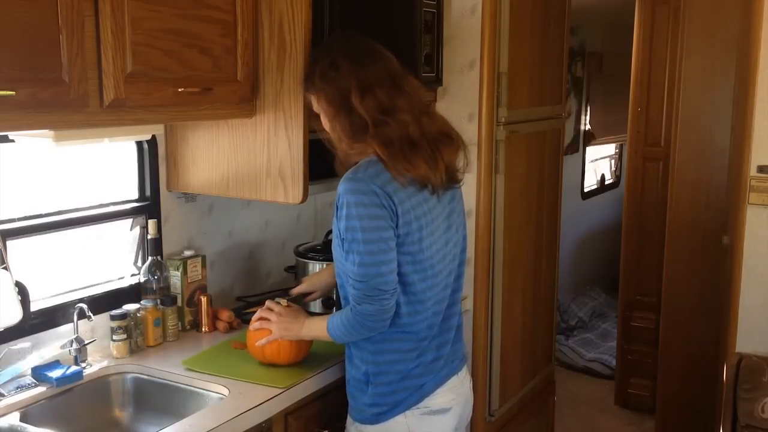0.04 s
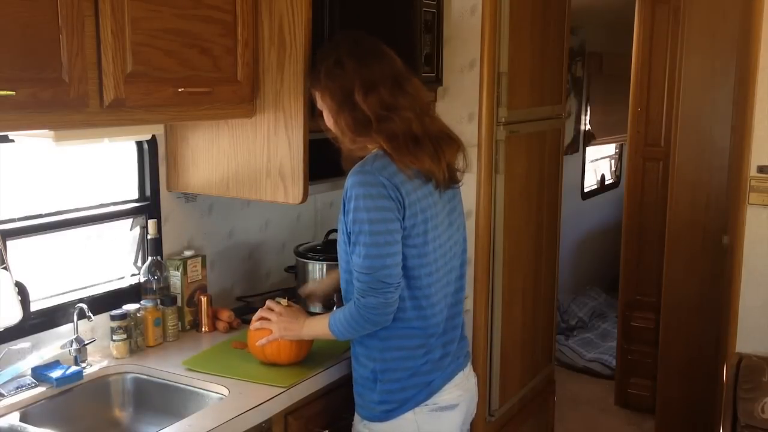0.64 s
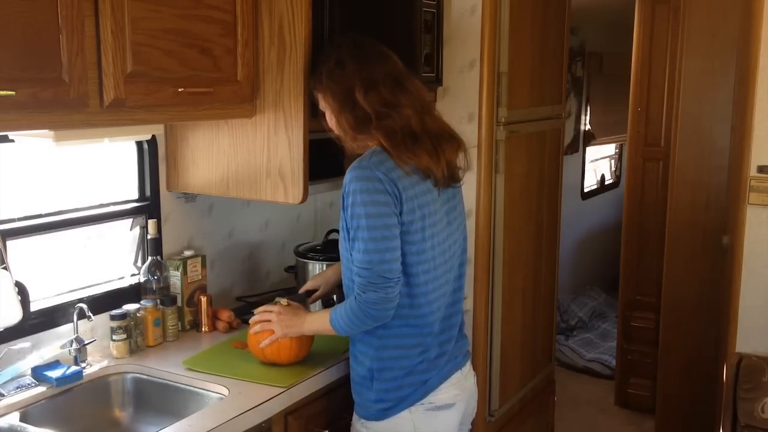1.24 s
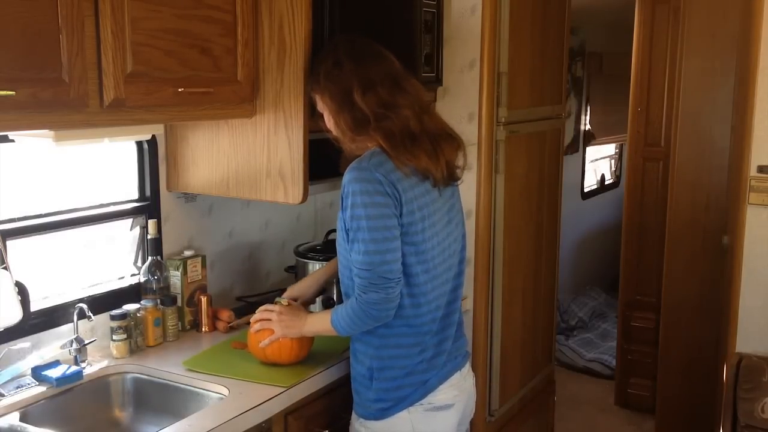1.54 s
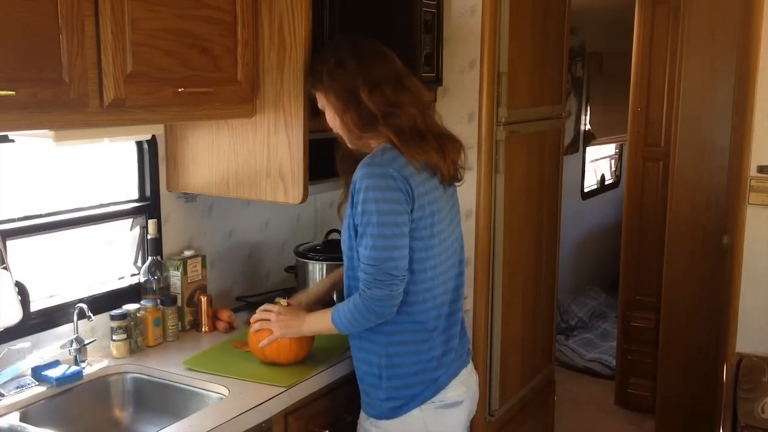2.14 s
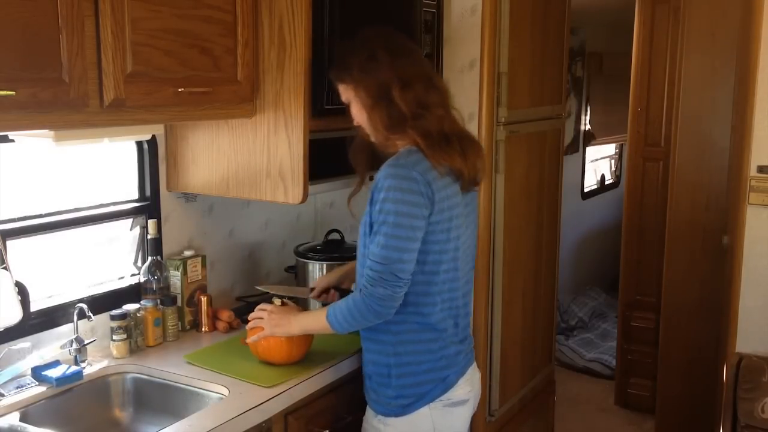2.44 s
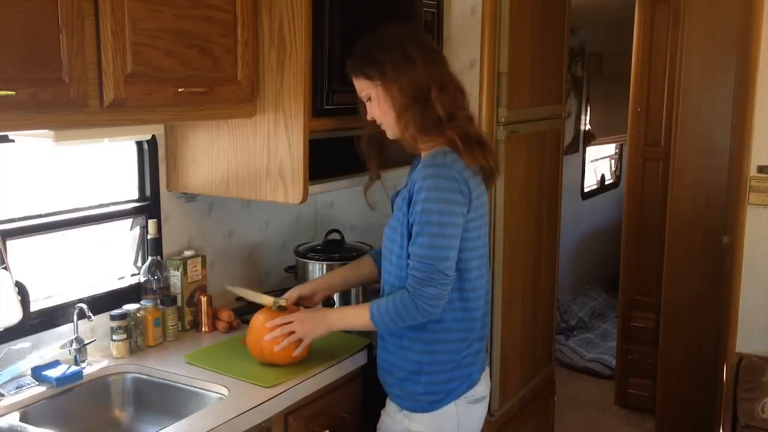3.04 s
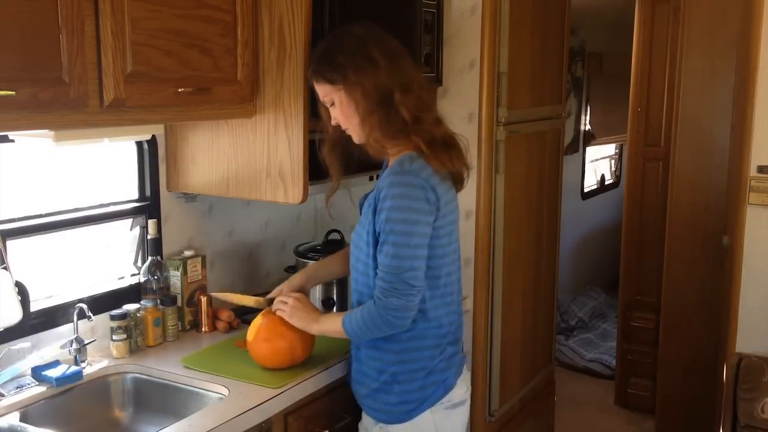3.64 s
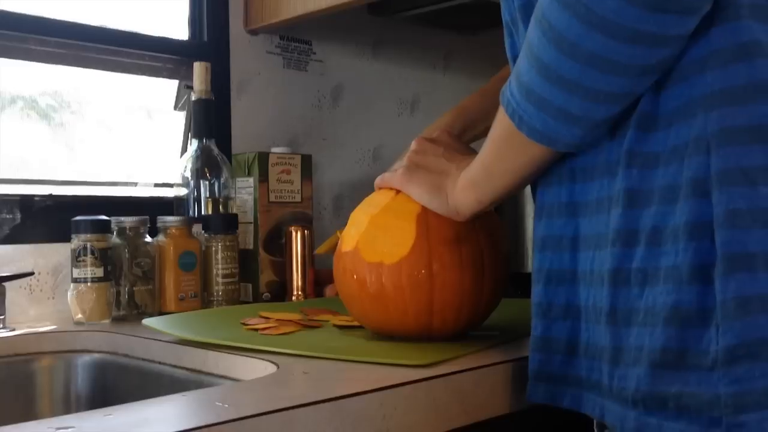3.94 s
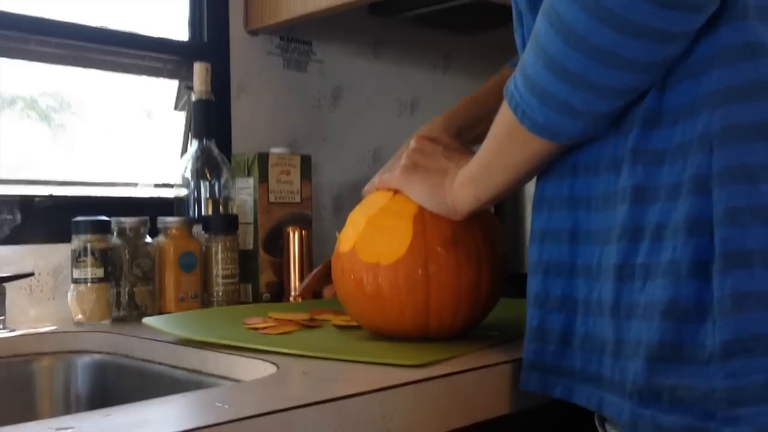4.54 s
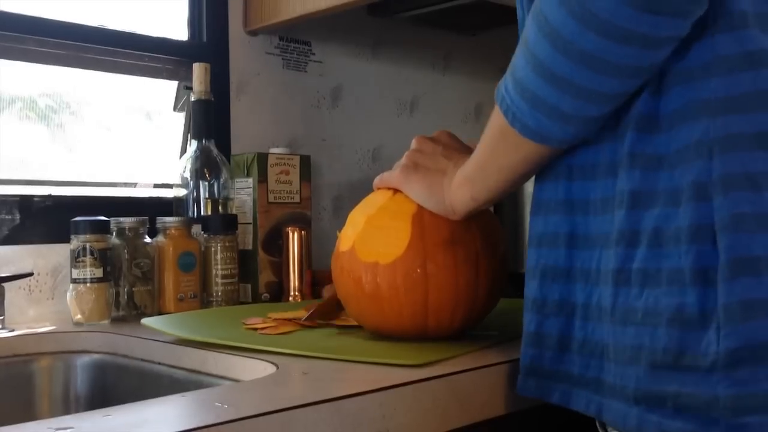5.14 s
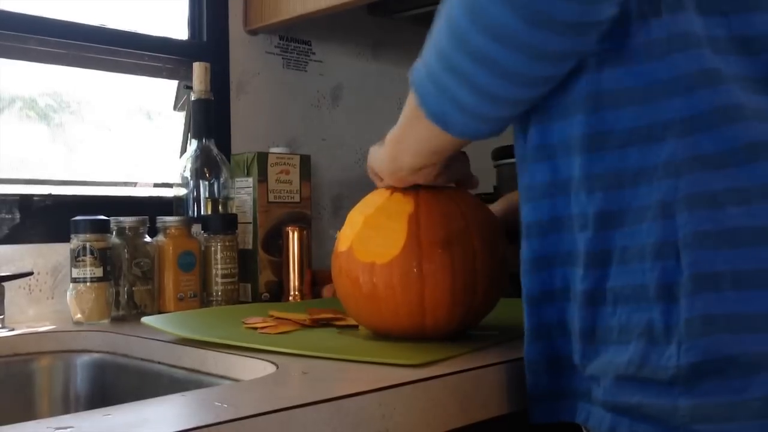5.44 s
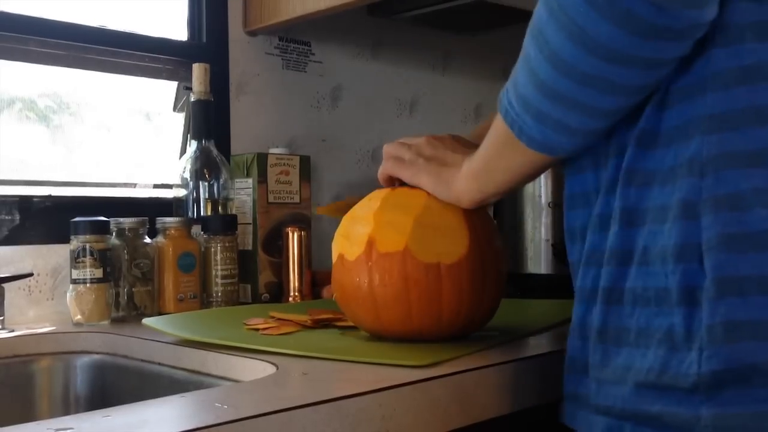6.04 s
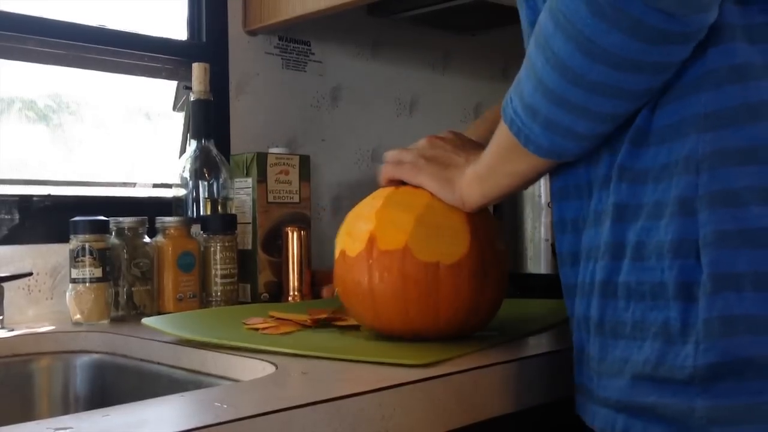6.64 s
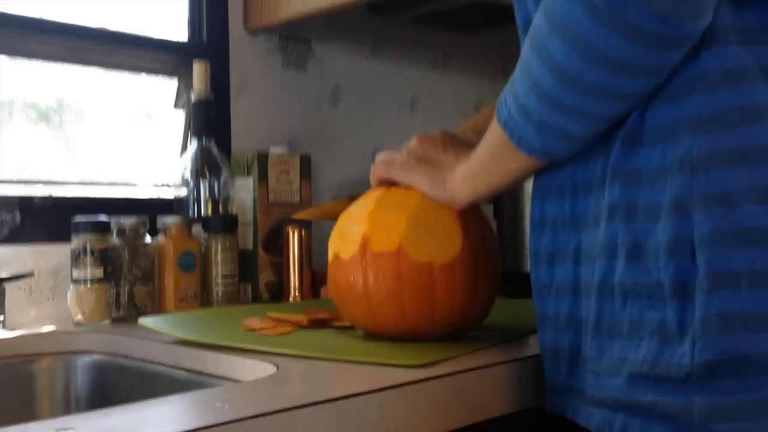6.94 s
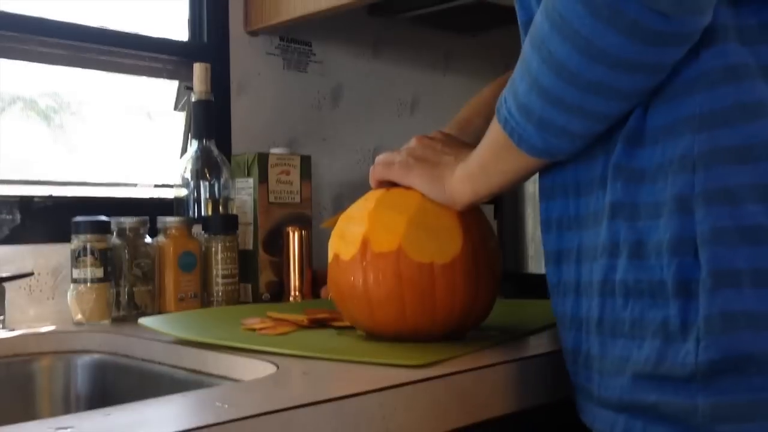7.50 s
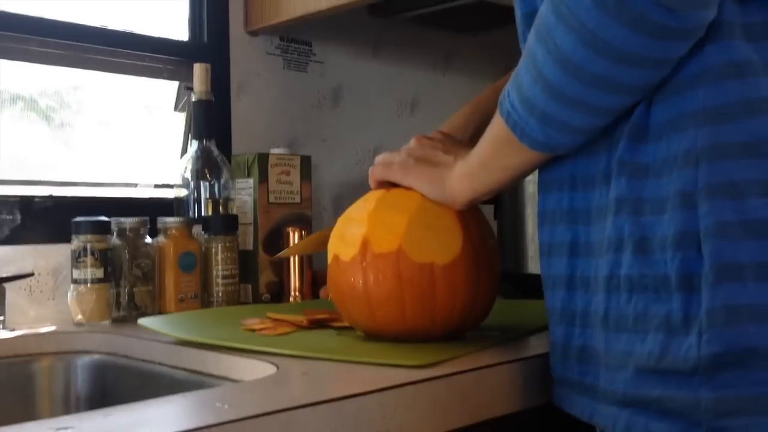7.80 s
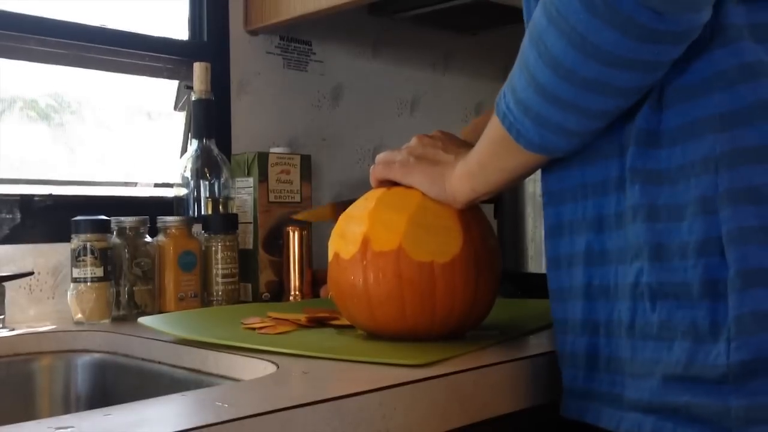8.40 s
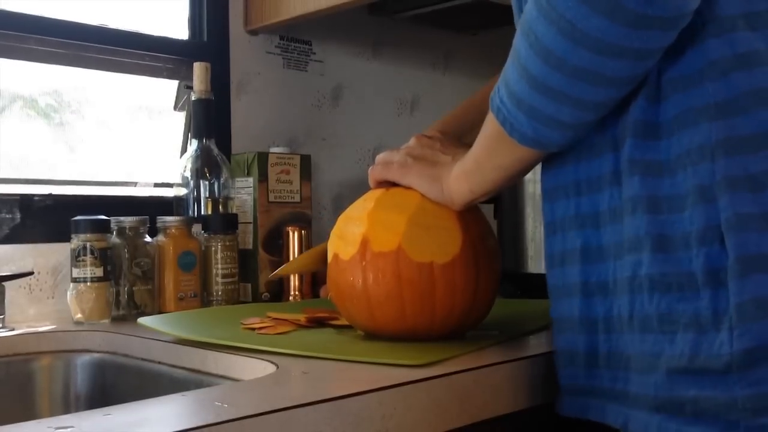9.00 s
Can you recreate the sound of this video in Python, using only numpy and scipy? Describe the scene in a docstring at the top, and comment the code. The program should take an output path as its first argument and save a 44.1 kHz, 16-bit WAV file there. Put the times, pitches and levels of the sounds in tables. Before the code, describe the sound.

Scattered raspy knife cuts through pumpkin rind and occasional blade knocks on a cutting board, over a faint kitchen appliance hum.

```python
"""Paring a pumpkin

A knife pares the rind off a pumpkin on a plastic cutting board in a cramped kitchen. Each stroke
bursts a stream of tiny cells and rubs the hollow fruit; now and then the blade breaks through and
knocks on the board. The rind splits, the blade ticks and creaks, and the pumpkin rocks under the hand.
An appliance whines over a soft hiss; both turn quieter partway through."""
import sys
import numpy as np
from scipy import signal
from scipy.fft import rfft, irfft, next_fast_len
from scipy.io import wavfile
from scipy.ndimage import uniform_filter1d

SR = 44100
rng = np.random.default_rng(int(sys.argv[2]) if len(sys.argv) > 2 else 0)


def wrap_up_sound(samples):
    """Save the sound to the file named by the first command line argument, as 16-bit audio."""
    columns = np.atleast_2d(samples).T
    # keep every value between -1 and 1, then stretch to whole-number steps
    tamed = np.clip(columns, -1, 1)
    steps = np.round(tamed * 32767).astype(np.int16)
    wavfile.write(sys.argv[1], SR, steps)


N = 408363
TIME = np.arange(N) / SR
HIT_TIME = np.arange(SR // 3) / SR  # the time axis of one short hit
CHANGE_S = 3.87  # from here on the background is quieter and the tearing brighter
FADE_DB, CURVE = 17.5, 1.25  # a push falls this far over one swell or release; CURVE > 1 rounds its top

# Event levels are relative: each function adds its own offset. A ring time is the time to fade 60 dB.
# knife strokes: (hardest push [s], swell [s], release [s], rubbing [dB], tearing [dB], peel pitch [Hz])
STROKES = [(0.08, 0.22, 0.17, -60, -61, 3500), (0.223, 0.062, 0.048, -42.5, -36.5, 3230),
           (0.335, 0.058, .16, -58, -58.5, 3500), (0.502, 0.051, 0.057, -47, -45, 5440),
           (1.555, 0.17, 0.087, -56, -57.5, 4500), (1.62, 0.045, 0.068, -46, -41.5, 5000),
           (1.79, 0.16, 0.071, -60.5, -59, 4550), (1.91, 0.14, 0.086, -50, -50.5, 4500),
           (2.08, 0.079, 0.069, -55.5, -60.5, 4000), (2.136, 0.027, 0.093, -57.5, -58.5, 3600),
           (3.068, 0.052, 0.052, -67.5, -57, 3800), (3.81, 0.087, .08, -59, -59, 3400),
           (4.6, 0.13, 0.29, -58, -65, 3800), (4.807, 0.032, 0.063, -55, -59, 3600),
           (4.858, 0.075, 0.053, -69, -63, 4540), (5.01, 0.15, .05, -59, -62, 4200),
           (5.094, 0.075, 0.034, -45, -30.5, 4100), (5.245, 0.12, .06, -58, -65, 4400),
           (5.343, 0.054, 0.03, -57.5, -55.5, 4200), (5.411, 0.011, 0.0058, -39, -43.5, 3400),
           (6.182, .06, 0.19, -60.5, -59.5, 4400), (6.285, 0.1, 0.078, -60.5, -66, 4500),
           (6.492, 0.067, 0.17, -62.5, -59, 5130), (6.672, 0.029, 0.053, -46.5, -37.5, 5480),
           (6.725, 0.03, 0.019, -48.5, -56, 4200), (7.9, .11, 0.073, -50, -51.5, 4250),
           (7.952, 0.05, 0.018, -67.5, -50.5, 9500), (8.108, 0.046, 0.022, -54, -64, 4220),
           (8.235, 0.056, 0.054, -49.5, -46, 4400), (8.28, .02, 0.03, -63, -49.5, 7500),
           (8.43, 0.17, .07, -59.5, -64.5, 4200), (8.543, 0.052, 0.04, -47, -45, 4570)]
# tone of tearing rind, before and after CHANGE_S: (frequency [Hz], level [dB])
TEAR_EARLY = [(300, -26.5), (900, -8), (1600, 2), (2800, -3.5), (4000, -3), (5500, -3), (7500, -2.5),
              (9500, -3), (12000, -7)]
TEAR_LATE = [(300, -27), (900, -3.5), (2000, -8.5), (2900, -4.5), (4000, -0.5), (5500, 0.5), (7500, 0),
             (9500, -4), (12000, -6)]
# resonances of the hollow pumpkin and the blade: (pitch [Hz], width [Hz], level [dB])
HOLLOW = [(304, 180, -5), (590, 100, -4), (860, 110, 5.5), (992, 170, 1.5), (1515.5, 350, -1),
          (1900, 320, -5.5)]
# knocks on the board: (time [s], level [dB], thud [dB], blade snap [dB], crack [dB], spot pitch [Hz])
KNOCKS = [(0.715, -44, -50, -56, -52, 1060), (2.191, -11.5, -25.5, -24, -25.5, 1770),
          (5.411, -27, -40, -50, -42.5, 950), (5.467, -44.5, -73, -64, -68, 1800),
          (6.735, -18, -29.5, -38, -32, 920), (6.792, -37.5, -55, -56, -51.5, 2320)]
# tones of the edge's crack and of crushed flesh: (frequency [Hz], level [dB])
CRACK_TONE = [(500, -18), (2000, -7.5), (3300, 3), (4200, 0.5), (6400, -1), (7500, -14.5), (8700, -8.5),
              (10500, -18), (12500, -23)]
CRUNCH_TONE = [(80, -33), (170, -9.5), (300, -8.5), (400, -10), (600, -9), (950, -0.5), (1350, -5.5),
               (1750, 2), (2400, -3.5), (3300, -4.5), (4200, -14), (8000, -31)]
# ringing of the steel blade, the board and the loaded counter: (pitch [Hz], level [dB], ring time [s])
BLADE_MODES = [(2840, -9.5, .03), (3080, -3, 0.025), (3224, 6.5, .022), (3514, -4.5, .028)]
BOARD_MODES = [(510, -6.5, 0.12), (570.5, -1, 0.023), (589, -1, .06), (835, -7.5, .07), (904, 3.5, .045),
               (1050, -1, 0.024), (1249, -5.5, 0.084), (1561, -1, .04), (1627, 2.5, .04),
               (1775, 1.5, 0.079), (1850, 3, .035), (1917, 1, 0.054), (2305, -3, 0.065), (2396, -1.5, .06)]
COUNTER_MODES = [(182, -1.5, .09), (215, 1.5, 0.096), (250, -0.5, 0.13), (317.3, -1, 0.12)]
# sudden splits of the rind: (time [s], level [dB])
SPLITS = [(0.203, -29.5), (0.4973, -36.5), (1.5994, -37), (1.617, -35.5), (1.897, -41.5), (4.803, -57),
          (5.0734, -29.5), (5.3123, -47.5), (5.3421, -47), (6.491, -47), (6.667, -37.5), (7.868, -42),
          (7.949, -47), (8.204, -44), (8.223, -34.5), (8.525, -37.5)]
# light ticks of blade and peel: (time [s], level [dB], pitch [Hz])
TICKS = [(0.6582, -47, 1590), (3.8625, -49.5, 1790), (4.0043, -51, 1480), (4.0392, -53.5, 1730),
         (4.934, -50, 1250), (8.6275, -36.5, 1760), (8.6471, -45, 1750), (8.678, -50, 1750),
         (8.7207, -42, 1920), (8.8952, -54.5, 1790), (8.971, -50.5, 1540), (9.112, -51.5, 2430)]
# tone of a light touch: (frequency [Hz], level [dB])
TICK_TONE = [(300, -5), (900, -0.5), (1600, 2.5), (2400, -4), (3600, -5.5), (6000, -11), (12000, -27)]
# the blade creaking in the flesh: (time [s], length [s], start pitch [Hz], end pitch [Hz], level [dB])
CREAKS = [(0.466, 0.05, 683, 882, -48), (4.551, 0.14, 814, 826, -64.5), (5.175, 0.052, 1437, 1740, -57.5),
          (5.22, .06, 1944, 2130, -68), (6.25, 0.042, 640, 566, -51.5), (6.306, 0.034, 520, 487, -62.5),
          (6.611, 0.035, 660, 770, -50), (8.21, 0.046, 810, 802, -47)]
# soft bumps of the pumpkin on the board, and a few thuds of the counter near 180 Hz as the rind splits: (time
# [s], level [dB], pitch [Hz])
BUMPS = [(0.02, -41.5, 59.4), (0.17, -40.5, 64.6), (0.315, -43.5, 58), (0.53, -45.5, 126), (0.575, -39, 53),
         (0.717, -54, 180), (1.601, -42.5, 180), (1.648, -40, 69.5), (1.875, -42.5, 60.4),
         (2.011, -43, 54.42), (2.145, -35.5, 54), (2.201, -35.5, 54), (3.648, -41.5, 58.6),
         (3.848, -48.5, 65), (4.703, -46, 162), (4.89, -44.5, 158), (5.076, -44.5, 185), (5.095, -45, 54),
         (5.149, -46, 85.4), (5.349, -44.5, 52.2), (6.721, -34.5, 51.8), (6.792, -35.5, 58),
         (7.938, -42.5, 57), (8.497, -41.5, 55), (8.574, -35, 55), (8.634, -47, 194), (8.668, -43, 56)]
# tone of the rolling fruit: (frequency [Hz], level [dB])
RUMBLE_TONE = [(20, -21.5), (35, -5.5), (55, 4), (75, -2), (120, -10.5), (200, -14.5), (350, -27),
               (700, -36.5)]
# tone of the background noise, before and after CHANGE_S: (frequency [Hz], level [dB])
AIR_EARLY = [(20, -12.5), (45, -5), (70, 1.5), (130, -7), (200, -8.5), (400, -16), (700, -18.5),
             (1400, -23), (4000, -22.5), (8000, -24.5), (12000, -26)]
AIR_LATE = [(20, -19), (45, -3.5), (70, 3), (130, -6), (200, -10), (400, -16), (700, -20.5), (1000, -20.5),
            (1500, -25.5), (4500, -24), (12000, -27.5)]
# appliance tones near multiples of twice the mains frequency, before and after: (pitch [Hz], level [dB])
HUM_EARLY = [(118.4, -64.5), (360.7, -78), (479.1, -82), (597.5, -76), (839.8, -83), (958.2, -63),
             (1077, -77)]
HUM_LATE = [(118.4, -70.5), (360.7, -83), (597.5, -81.5), (839.8, -91.5), (958.2, -69.5), (1077, -87)]
# how long the kitchen echoes: (frequency [Hz], ring time [s])
ROOM_DECAY = [(100, .18), (300, 0.18), (1000, 0.17), (2000, 0.13), (4000, 0.1), (12000, 0.097)]


def paring(late, tear_db=-2.5, rub_db=-3, peel_db=-1, slips_per_s=200, slip_s=0.0022):
    """The blade moves in small slips; tearing rind rings the peel, rubbing sounds the hollow fruit."""
    tear_power, bite_share = 1.15, .7  # tearing outgrows the push and fills only this share of the swell
    jerks = through(1. * (rng.random(N) < slips_per_s / SR), np.exp(-HIT_TIME / slip_s))
    slips = unit((1 + jerks) * undb(wander(150)))
    cells = fractures(per_s=6000, spread_db=3.5)
    tear = (1 - late) * unit(colour(cells, TEAR_EARLY)) + late * unit(colour(cells, TEAR_LATE))
    drag = fractures(per_s=1800, spread_db=5)
    cut = np.zeros(N)
    for s, swell_s, release_s, rubbing_db, tearing_db, peel_hz in STROKES:
        span, gain = push(s, swell_s, release_s)
        grip = 1 + 0.044 * rng.standard_normal()  # each new grip shifts and reweights the resonances
        rub = 0
        for hz, width_hz, db in HOLLOW:
            band = resonate(drag[span], grip * hz, width_hz)
            rub += undb(db + 2 * rng.standard_normal()) * resonate(band, grip * hz, width_hz)
        crisp = tear[span] + undb(peel_db) * resonate(tear[span], peel_hz, width_hz=1300)
        bite = gain ** (tear_power / np.where(TIME[span] < s, bite_share ** CURVE, 1))
        cut[span] += undb(rubbing_db + rub_db) * gain * unit(rub)
        cut[span] += undb(tearing_db + tear_db) * bite * crisp
    walls = room(echo_db=-5.5)
    return through(slips * cut, walls / np.sqrt(np.sum(walls ** 2)))


def push(s, swell_s, release_s):
    """One push of the blade swells and lets go: returns the samples it covers and its strength."""
    span = slice(max(int((s - 2 * swell_s) * SR), 0), int((s + 2 * release_s) * SR))
    from_peak = np.maximum((s - TIME[span]) / swell_s, (TIME[span] - s) / release_s)
    return span, undb(-FADE_DB * from_peak ** CURVE)


def fractures(per_s, spread_db):
    """A stream of bursting cells: many small clicks and a few large ones."""
    size = undb(spread_db * np.minimum(rng.exponential(size=N), 4))
    sign = rng.choice([-1, 1], N)
    return size * sign * (rng.random(N) < per_s / SR)


def knocks(board_lag_s=.002, counter_lag_s=.0035):
    """The last flesh crunches, the edge cracks down, blade and board ring, and the counter thuds."""
    out = np.zeros(N)
    for s, db, thud_db, snap_db, crack_db, spot_hz in KNOCKS:
        crack = through(colour(burst(0.0018), CRACK_TONE), room(echo_db=-1))
        crunch = through(colour(burst(0.0027), CRUNCH_TONE), room(echo_db=1.5))
        crunch += resonate(crunch, spot_hz, .2 * spot_hz)  # the struck spot rings
        snap = through(ring(BLADE_MODES, scatter_db=3, detune=0.0051), room(echo_db=-9))
        clack = through(ring(BOARD_MODES, scatter_db=-0.5, detune=0.0046), room(echo_db=-5.5))
        thud = through(ring(COUNTER_MODES, scatter_db=1, detune=.01), room(echo_db=-12))
        add(out, s, at_level(crack, crack_db) + at_level(crunch, db - 11))
        add(out, s + board_lag_s, at_level(clack, db - 10.5) + at_level(snap, snap_db + 1))
        add(out, s + counter_lag_s, at_level(thud, thud_db + 1))
    return out


def splits(offset_db=-13):
    """A fibre of rind gives way at once, with a brief bright crackle."""
    out = np.zeros(N)
    for s, db in SPLITS:
        crackle = colour(burst(0.0019), TEAR_EARLY)
        add(out, s, at_level(through(crackle, room(echo_db=0)), db + offset_db))
    return out


def ticks(offset_db=-8, ring_db=7):
    """Light touches ring the blade, damped by the flesh, at a pitch that depends on the grip."""
    out = np.zeros(N)
    for s, db, hz in TICKS:
        touch = colour(burst(.0016), TICK_TONE)
        tick = touch + undb(ring_db) * resonate(touch, hz, width_hz=340)
        add(out, s, at_level(through(tick, room(echo_db=-1)), db + offset_db))
    return out


def creaks(wobble=0.083, grain_db=2.5, offset_db=-6.5):
    """Steel sticks and slips in wet flesh: a rough, brief tone that glides with the pressure."""
    out = np.zeros(N)
    for s, length_s, start_hz, end_hz, db in CREAKS:
        count = int(length_s * SR)
        hz = np.linspace(start_hz, end_hz, count) * (1 + wobble * wander(900)[:count])
        tone = np.sin(2 * np.pi * np.cumsum(hz) / SR) * undb(grain_db * wander(400)[:count])
        add(out, s, undb(db + offset_db) * unit(tone) * np.hanning(count))
    return through(out, room(echo_db=-1))


def rocking(late, late_roll_db=-3, bump_offset_db=-5.5, lag_s=0.024):
    """The heavy fruit rolls on its ribs, lagging behind each push, and sets down softly; now and then the
    counter thuds."""
    force = np.zeros(N)
    for s, swell_s, release_s, rubbing_db, _, _ in STROKES:
        span, gain = push(s, swell_s, release_s)
        force[span] += undb(rubbing_db) * gain
    memory = np.exp(-1 / (lag_s * SR))
    roll = signal.lfilter([1 - memory], [1, -memory], force)
    rumble = unit(colour(rng.standard_normal(N), RUMBLE_TONE))
    out = undb(late * late_roll_db) * roll * rumble
    for s, db, hz in BUMPS:
        weight = signal.lfilter(*signal.butter(1, 500, fs=SR), burst(0.0045))
        bump = resonate(weight, hz, width_hz=.4 * hz)
        add(out, s, at_level(through(bump, room(echo_db=-8.5)), db + bump_offset_db))
    return out


def background(air_tone, hum, air_db, waver_db=.5, drift_rad=.12):
    """Low rumble and even hiss under the slightly wavering whine of an appliance."""
    out = undb(air_db) * unit(colour(rng.standard_normal(N), air_tone))
    for hz, db in hum:
        phase = 2 * np.pi * (hz * TIME + rng.random()) + drift_rad * wander(4)
        out += np.sqrt(2) * undb(db + waver_db * wander(16)) * np.sin(phase)
    return out


def room(echo_db, build_s=0.0021):
    """Direct sound, then dense echoes from nearby cupboards; the treble dies first."""
    spectrum = rfft(rng.standard_normal(len(HIT_TIME)))
    hz = np.fft.rfftfreq(len(HIT_TIME), 1 / SR)
    octave = np.log2(np.clip(hz, 125, 16000) / 125)
    tail = 0
    for k in range(8):
        band = irfft(spectrum * np.maximum(1 - abs(octave - k), 0), len(HIT_TIME))
        tail += band * undb(-60 * HIT_TIME / look_up(ROOM_DECAY, 125 * 2 ** k))
    tail *= 1 - np.exp(-(HIT_TIME / build_s) ** 2)
    response = undb(echo_db) * tail / np.sqrt(np.sum(tail ** 2))
    response[0] += 1  # the direct sound
    return response


def ring(modes, scatter_db, detune):
    """Fading tones of a struck object; their strength and sign depend on where the blow lands."""
    hz, db, ring_s = np.transpose(modes)[:, :, None]
    size, shift, side = rng.standard_normal((len(modes), 3)).T[:, :, None]
    decay = undb(db + scatter_db * size - 60 * HIT_TIME / ring_s)
    tones = np.sin(2 * np.pi * hz * (1 + detune * shift) * HIT_TIME)
    return np.sum(np.sign(side) * decay * tones, axis=0)


def burst(swell_s):
    """A short crunch that swells and dies as the edge bites, pushing all frequencies alike."""
    swell = HIT_TIME / swell_s * np.exp(-HIT_TIME / swell_s)
    spectrum = rfft(rng.standard_normal(len(HIT_TIME)) * swell)
    flat = irfft(spectrum / abs(spectrum), len(HIT_TIME))
    return flat * np.exp(-(HIT_TIME / (8 * swell_s)) ** 2)


def colour(x, tone):
    """Filter a sound with a table of (frequency [Hz], level [dB])."""
    size = 2 * next_fast_len(len(x))
    gain = undb(look_up(tone, np.fft.rfftfreq(size, 1 / SR)))
    cepstrum = irfft(np.log(gain))
    cepstrum[1:size // 2] *= 2  # folded forward, so that nothing sounds ahead of a hit
    cepstrum[size // 2 + 1:] = 0
    return irfft(rfft(x, size) * np.exp(rfft(cepstrum)))[:len(x)]


def look_up(table, hz):
    """Read between the rows of a table, on a log-frequency axis."""
    row_hz, value = np.transpose(table)
    return np.interp(np.log(hz + 1), np.log(row_hz), value)


def resonate(x, hz, width_hz):
    """One resonance, with gain 1 at its centre."""
    return signal.lfilter(*signal.iirpeak(hz, hz / width_hz, fs=SR), x)


def through(x, response):
    """Pass a sound through a response (convolve) and keep its length."""
    return signal.fftconvolve(x, response)[:len(x)]


def wander(per_s):
    """A smooth random curve with a spread near 1."""
    hold = max(int(SR / per_s), 1)
    steps = np.repeat(rng.standard_normal(N // hold + 1), hold)
    return 1.3 * uniform_filter1d(uniform_filter1d(steps, hold), hold)[:N]


def undb(db):
    """Turn decibels into gain."""
    return 10 ** (np.asarray(db) / 20)


def unit(x):
    """Scale to an average (rms) level of 1."""
    return x / np.sqrt(np.mean(x ** 2))


def at_level(x, db):
    """Set the level of a hit, as if its energy were spread over 20 ms."""
    return x * undb(db) / np.sqrt(np.sum(x ** 2) / (SR * .02))


def add(track, s, sound):
    """Mix a sound in at s seconds."""
    start = int(s * SR)
    track[start:start + len(sound)] += sound[:N - start]


def scene():
    """Knife work over a background that drops at CHANGE_S, in one channel."""
    late = uniform_filter1d((TIME > CHANGE_S) * 1., size=600)  # goes quickly from 0 to 1
    kitchen = (1 - late) * background(AIR_EARLY, HUM_EARLY, air_db=-58.5)
    kitchen += late * background(AIR_LATE, HUM_LATE, air_db=-63.5)
    return (knocks() + ticks() + creaks() + rocking(late) + paring(late) + splits() + kitchen)[None]


def record(dry, low_cut_hz=36, top_hz=11950):
    """The small microphone loses the deepest bass, and the highest treble is cut steeply."""
    thin = signal.sosfilt(signal.butter(3, low_cut_hz, "high", fs=SR, output="sos"), dry)
    return signal.sosfilt(signal.ellip(10, .2, 70, top_hz, fs=SR, output="sos"), thin)


dry = scene()
out = record(dry)
wrap_up_sound(out)
```